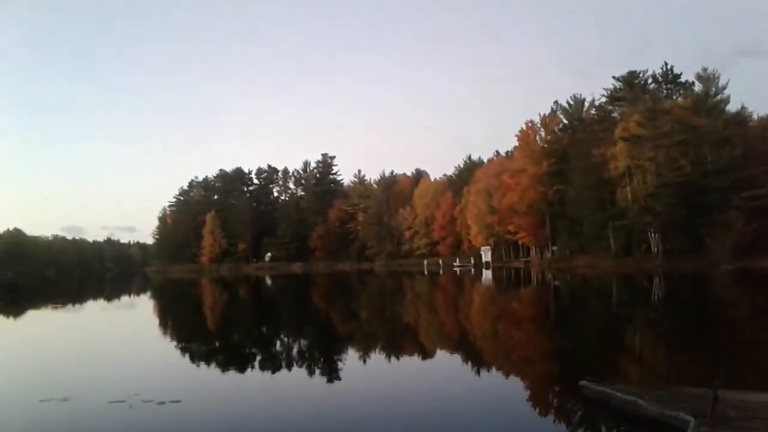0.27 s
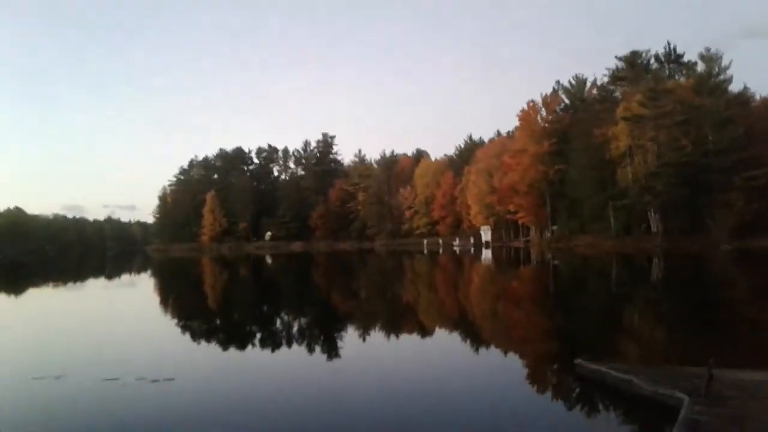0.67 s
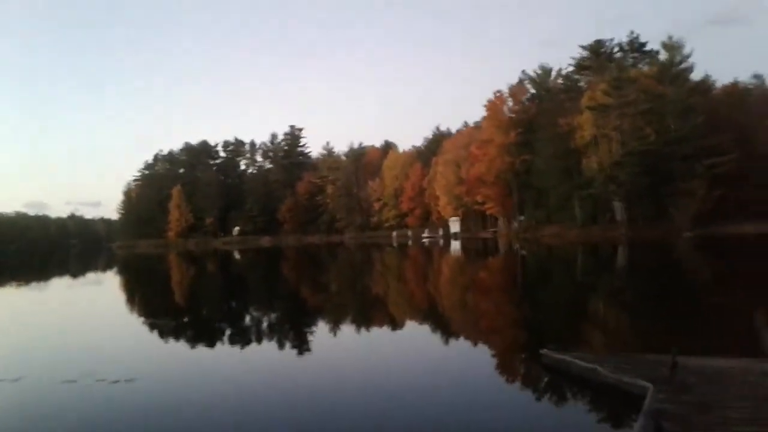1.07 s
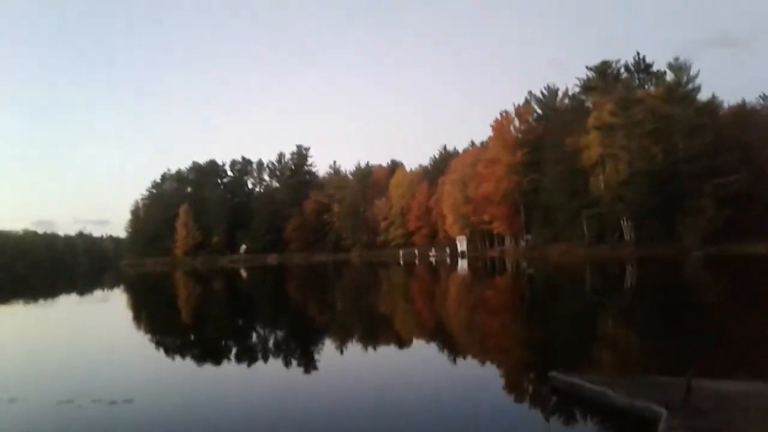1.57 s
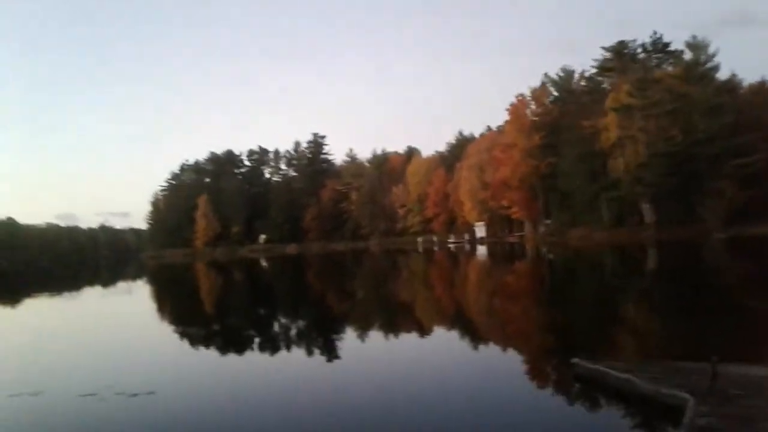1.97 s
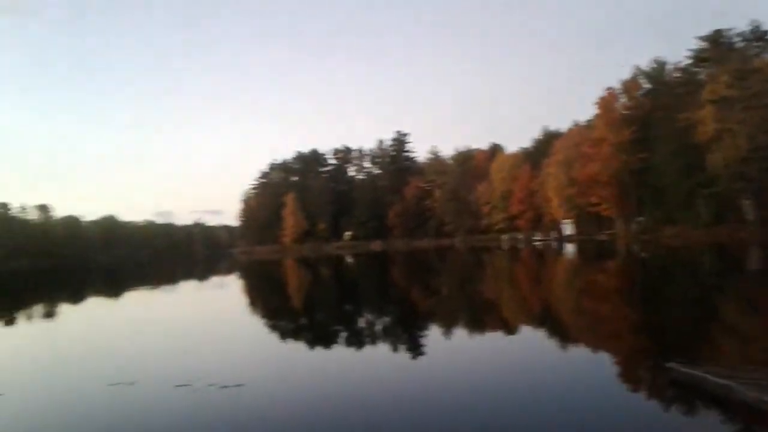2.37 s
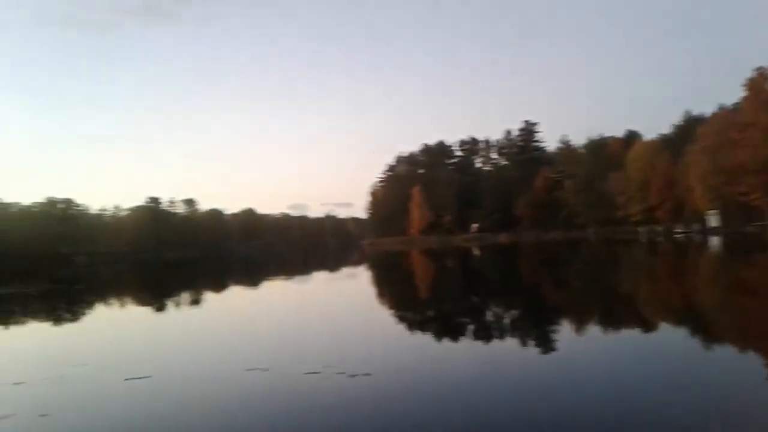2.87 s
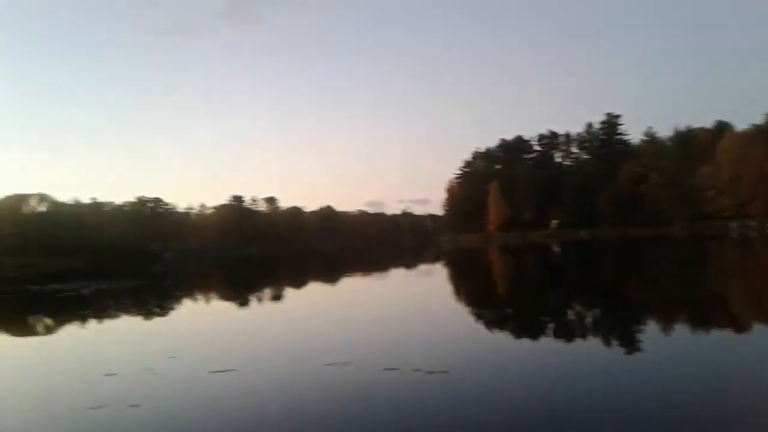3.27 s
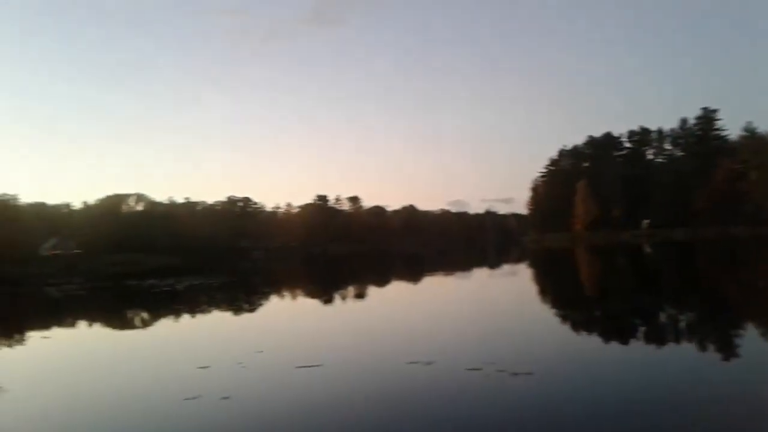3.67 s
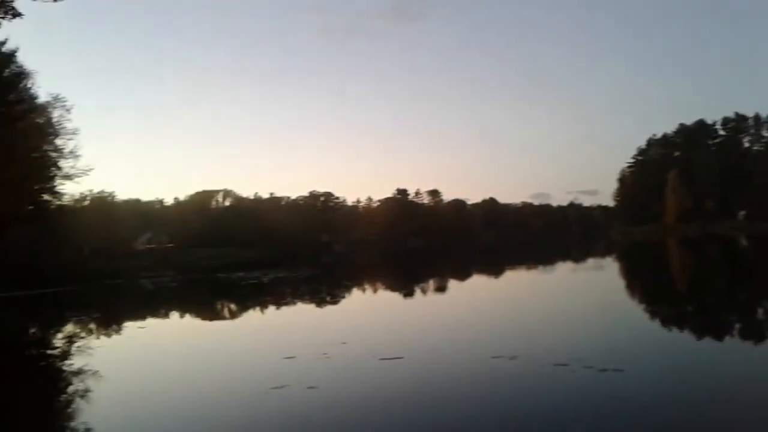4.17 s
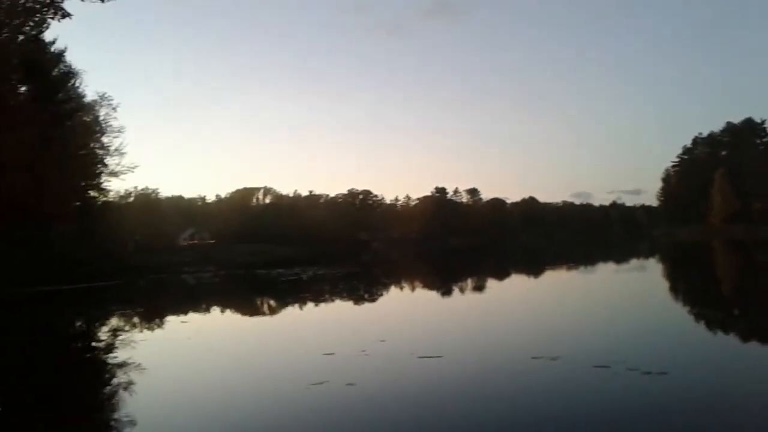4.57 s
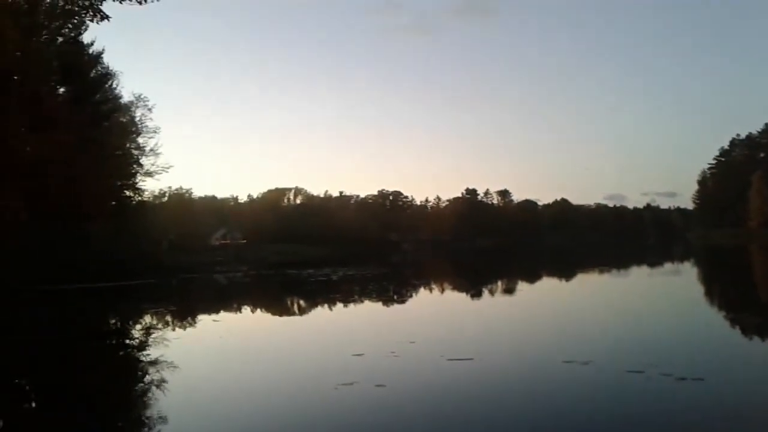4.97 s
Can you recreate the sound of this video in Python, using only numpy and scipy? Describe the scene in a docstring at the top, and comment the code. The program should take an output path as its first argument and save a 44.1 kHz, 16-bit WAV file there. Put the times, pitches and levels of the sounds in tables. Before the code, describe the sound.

Still outdoor air and faint hiss run throughout, heard through a small stereo camera by a wooded lake. At 0 s a dog's howl, off to the right, is already sounding with a rough rattle; by 0.2 s it clears to a mid-pitched hollow note and drops from about 0.5 s, leaving a dull echo from the trees. A very faint burry bird chip comes at 0.6 s. Tiny dry ticks occur at 0.1 s and in the pause, around 1.1, 1.5, 1.8 and 2 s. At 2.1 s a second howl scoops up with a bright, open yelp and holds steady. A chip sounds at 2.7 s. Around 3 s the voice cracks in quick breaks, then rattles loosely, slowing until 3.8 s, when it clears into a smooth, gradually softening note. Another chip at 4.2 s. The howl falls quickly just after 4.5 s, leaving fading echo and quiet air.

```python
"""A still lake: a dog's howl is already under way, rattling, then it clears and drops; a small bird chips.
A second howl scoops up, cracks into quick runs and a rattle, clears and drops, with two more chips.
The voice is harmonics whose pitch slips an octave, shaped by a throat; the wooded shore echoes as fading noise.
The chips are arched whistles. Faint ticks, short resonant noise bursts, come during the first howl and
between the howls. Soft air and hiss, both coloured noise, run throughout, heard through a small stereo camera."""
import sys
import numpy as np
from scipy import signal
from scipy.fft import rfft, irfft
from scipy.io import wavfile
from scipy.ndimage import uniform_filter1d, map_coordinates

SR = 44100
rng = np.random.default_rng(int(sys.argv[2]) if len(sys.argv) > 2 else 0)


def wav_record(signal):
    """Record a signal, one row per channel, as 16-bit PCM in the file named by sys.argv[1]."""
    frames = np.transpose(np.atleast_2d(signal))
    bounded = np.clip(frames, -1, 1)
    # unit amplitude maps onto the largest positive 16-bit level
    quanta = np.round(bounded * 32767).astype(np.int16)
    wavfile.write(sys.argv[1], SR, quanta)


N = 230062
T = np.arange(N) / SR  # time of each sample, s


def undb(db):
    """Turn decibels into gain."""
    return 10 ** (np.asarray(db) / 20)


def unit(x):
    """Scale to an rms of 1."""
    return x / np.sqrt(np.mean(x ** 2))


def curves(rows):
    """Join the points of a table by straight lines in time, one curve per column."""
    s, *columns = np.transpose(rows)
    return [np.interp(T, s, column) for column in columns]


def colour(x, points, share=1):
    """Filter by a spectrum of (f/Hz, level/dB) points, joined over log frequency."""
    size = 2 ** 18
    hz, db = np.transpose(points)
    f = np.maximum(np.fft.rfftfreq(size, 1 / SR), 1)
    gain = undb(share * np.interp(np.log(f), np.log(hz), db))
    return irfft(rfft(x, size) * gain)[..., :N]


def walk(rate):
    """Wander smoothly and at random, with rms 1, through `rate` random points per second."""
    knots = rng.standard_normal(4096)
    return unit(map_coordinates(knots, [T * rate], order=2, mode="wrap"))


def swell(s, rise_s, decay_s):
    """Rise smoothly to 1 at time s, then die away exponentially."""
    before, after = np.minimum(T - s, 0), np.maximum(T - s, 0)
    return np.exp(-(before / rise_s) ** 2 - after / decay_s)


# How throat and muzzle colour the voice: (f/Hz, level/dB)
THROAT = [(50, -37), (130, -3.5), (260, -14), (350, -4), (420, 1.5), (560, -3.5), (690, 1.5), (790, -2),
          (910, -1), (1050, -7.5), (1170, -5.5), (1320, -18), (1600, -27), (2100, -30.5), (2600, -48.5),
          (3650, -46), (4150, -44.5), (4600, -62), (5000, -53), (6000, -58)]
# Upper resonance of the mouth, which moves with the lips: (t/s, f/Hz, lift/dB)
FORMANT = [(.2, 2000, 2), (.45, 1800, -2), (2.16, 2210, 43), (2.22, 1940, -33), (2.45, 1950, -19),
           (3.0, 1960, 8), (3.65, 1920, 8), (4.0, 1770, 16), (4.5, 1816, 17.5)]
LOOSE_HZ = 172  # below this pitch the folds stop sounding


def dog(jitter=0.0061, crack_jitter=0.0317, shimmer_db=0.0, crack_db=1.0, snap_db=1.0,
        rasp_db=-43, shaky_rasp_db=12, voice_db=-1, formant_width_hz=130,
        ring_hz=682, ring_width_hz=45, ring_db=5, calm_ring_db=-6):
    """The vocal folds make harmonics, half lines when hoarse and a little rasp; the throat shapes them all."""
    times = slip_times()
    hz, db, mouth_db, edge_db, hoarse, shaky, runs_db = gesture(times)
    sounding = 1 / (1 + (LOOSE_HZ / hz) ** 6)
    firm = np.minimum(hz / 390, 1) ** 6.8  # loose folds at low pitch give almost a pure tone

    # pitch and strength are unsteady close to a slip, just after the yelp and in the drop
    midway = (times[1:] + times[:-1]) / 2
    nearest_slip = times[np.searchsorted(midway, T)]
    unsteady = np.maximum(np.exp(-((T - nearest_slip) / 0.014) ** 2), shaky)
    shaken_hz = hz * (1 + (jitter + crack_jitter * unsteady) * walk(200))
    hz, phase, strain, slack = slips(shaken_hz, times)

    half = hoarse * (1 - strain) * (1 - slack) * (1 + .5 * walk(45))
    odd = 1 - slack ** 2  # odd harmonics grow back after a slip
    formant_hz, lift_db = curves(FORMANT)
    lift = undb(lift_db)
    folds = 0
    for k in np.arange(1, 25) / 2:  # multiples of the pitch: 0.5, 1, 1.5 ... 12
        if k % 1:
            strength = half
        elif k % 2:
            strength = odd
        else:
            strength = 1
        resonance = 1 + lift / (1 + ((k * hz - formant_hz) / formant_width_hz) ** 2)
        folds = folds + np.sqrt(2) * firm ** abs(k - 1) * strength * resonance * np.cos(k * phase)

    # rasp is noise that pulses once per turn of the folds
    rasp_gain = undb(rasp_db + shaky_rasp_db * shaky) * firm * np.sqrt(SR / hz)
    rasp = rasp_gain * rng.standard_normal(N) * (1 + np.cos(phase))
    snap = slack ** 0.39  # each slip starts with a push that dies away
    tremble_db = crack_db * unsteady * walk(120) + snap_db * (2 * snap - 0.5) * unsteady
    voice = colour((folds + rasp) * undb(tremble_db), THROAT)

    # a narrow throat resonance rings more strongly wherever the voice is unsteady
    struck = voice * (undb(calm_ring_db) + unsteady * undb(ring_db + runs_db))
    b, a = signal.iirpeak(ring_hz, ring_hz / ring_width_hz, fs=SR)
    voice = voice + signal.lfilter(b, a, struck)

    # the open mouth lifts the middle band, effort lifts the top
    low = signal.sosfiltfilt(signal.butter(8, 780, fs=SR, output="sos"), voice)
    below_top = signal.sosfiltfilt(signal.butter(8, 1270, fs=SR, output="sos"), voice)
    voice = low + undb(mouth_db) * (below_top - low) + undb(edge_db) * (voice - below_top)
    return voice * undb(db + voice_db + shimmer_db * walk(24.55)) * sounding


# Base pitch of the held note, in three stretches where the voice is clear: (t/s, f/Hz)
NOTE = [
    [(0.245, 490), (0.291, 464), (0.373, 464.4), (0.387, 446.4), (0.46, 451.3)],
    [(2.24, 468.7), (2.458, 455.3), (2.566, 464.7), (2.578, 452.9), (2.88, 447.1)],
    [(3.83, 465), (3.898, 456.4), (4.272, 446.6), (4.398, 423.6), (4.51, 453.8)],
]
# a rattling voice is sharper, louder, slightly less open-mouthed, slightly edgier and hoarser
RATTLE_OCTAVES, RATTLE_DB, RATTLE_MOUTH_DB, RATTLE_EDGE_DB, RATTLE_HOARSE_DB = .08, 2.5, -1, 1, -18


def gesture(times, blend_s=.05, full_count=2):
    """Follow the howl with the greater pitch share, straining it in a rattle: pitch to extra ring in runs."""
    each = np.array([howl(*row) for row in HOWLS])
    strongest = each[:, 0].argmax(axis=0)
    share, db, mouth_db, edge_db, half, shaky = each[strongest, :, np.arange(N)].T
    recent_slips = np.searchsorted(times, T) - np.searchsorted(times, T - blend_s)
    rattle = uniform_filter1d(np.minimum(recent_slips / full_count, 1), int(blend_s * SR / 2))
    runs_db = sum(extra * np.exp(-(2 * (T - s) / length - 1) ** 4) for s, length, extra in RUNS)
    hz = curves(np.concatenate(NOTE))[0] * share * 2 ** (RATTLE_OCTAVES * rattle)
    return (hz,
            db + RATTLE_DB * rattle,
            mouth_db + RATTLE_MOUTH_DB * rattle,
            edge_db + RATTLE_EDGE_DB * rattle,
            half + undb(RATTLE_HOARSE_DB) * rattle,
            shaky,
            runs_db)


# The howls, the first already under way: (start t/s, release t/s, time to fall an octave/s,
# base level/dB, base lift of the band near 900 Hz/dB, base level of the hoarse half lines/dB)
HOWLS = [(-.6, .468, .078, -47, -0.5, -21), (2.118, 4.54, 0.0413, -47, 4, -30.5)]
SCOOP_S = 0.027  # a howl scoops up to its note
# it opens with a yelp: loud, wide-mouthed and bright, then briefly hoarse
YELP_AFTER_S, YELP_RISE_S, YELP_DECAY_S = 0.069, 0.011, 0.14
YELP_DB, YELP_EDGE_DB = 2, 10
GAPE_DB, GAPE_S = 15.5, 0.018
HOARSE_AFTER_S, HOARSE_RISE_S, HOARSE_DECAY_S, HOARSE_DB = .088, 0.0079, 0.037, -4
# on the held note: upper overtones are lifted; the voice tires slowly and dulls ever faster
EDGE_DB = 7
TIRE_DB_PER_S, DULL_DB_PER_S2 = 1.41, 2.5
# it ends with a last push; the mouth is more shut the further the pitch lies below the note
PUSH_DB, SHUT_DB_PER_OCTAVE = 5, 22.5


def howl(start, release, fall_s, db, mouth_db, hoarse_db, fall_curve=1.5):
    """Shape a scoop, yelp, held note and drop: share of pitch, level, mouth, edge, half lines, shakiness."""
    age = np.maximum(T - start, 0)
    scoop = (1 + np.tanh((T - start) / SCOOP_S / 2)) / 2
    fall = np.maximum(T - release, 0) / fall_s
    share = scoop / 2 ** np.minimum(fall ** fall_curve, 4)  # falls by four octaves at most
    octaves_below = -np.log2(np.maximum(share, 1 / 16))
    yelp = swell(start + YELP_AFTER_S, YELP_RISE_S, YELP_DECAY_S)
    gape = np.exp(-((age - YELP_AFTER_S) / GAPE_S) ** 2)
    croak = swell(start + HOARSE_AFTER_S, HOARSE_RISE_S, HOARSE_DECAY_S)
    push = np.sin(np.pi * np.minimum(fall, 1))
    return (share,
            db + YELP_DB * yelp + PUSH_DB * push - TIRE_DB_PER_S * age,
            mouth_db + GAPE_DB * gape - SHUT_DB_PER_OCTAVE * octaves_below,
            EDGE_DB + YELP_EDGE_DB * yelp - DULL_DB_PER_S2 * age ** 2,
            undb(hoarse_db) + undb(HOARSE_DB) * croak,
            np.maximum(croak, push))


# Rattles, where the folds slip at a loose beat:
# (start t/s, end t/s, gap between slips/s, last gap/s, time over which the gaps widen/s)
RATTLES = [(-.06, .199, .0238, .066, .02), (3.03, 3.806, .022, .045, .105)]
# Quick runs of slips, where the voice breaks hardest: (t/s, length/s, extra ring of the throat/dB)
RUNS = [(2.964, 0.022, 12.5), (3.057, .017, 12), (3.096, 0.047, 11.5), (3.168, .016, 4), (3.206, .033, 5)]
SLIP_HZ, SLIP_SCATTER_S = 115, .002  # rate of slips in a quick run; looseness of the rattle's beat


def slip_times():
    """Slips come at a loose beat that slows before the voice clears; in a quick run they crowd together."""
    times = []
    chances = rng.standard_normal((len(RATTLES), 80))
    for (start, end, gap, last_gap, widen_s), chance in zip(RATTLES, chances):
        s = end  # counted backwards from the end of the rattle
        for c in chance:
            in_run = any(-1 / SLIP_HZ < s - at < length for at, length, _ in RUNS)
            if s > start and not in_run:
                times.append(s + SLIP_SCATTER_S * c)
            s -= gap + (last_gap - gap) * np.exp((s - end) / widen_s)
    quick = [np.arange(at, at + length, 1 / SLIP_HZ) for at, length, _ in RUNS]
    return np.sort(np.concatenate([times] + quick))


def slips(hz, times, rise=.27, strain_s=.013, sag=.19, sag_s=.015, recover_s=.0017, uneven=.06):
    """The folds tighten, slip into the octave below, snap part of the way back and climb again."""
    edges = np.concatenate([[-1], times, [T[-1] + 1]])
    k = np.searchsorted(edges, T, side="right")
    since, until = T - edges[k - 1], edges[k] - T
    along = since / (since + until)  # 0 at the last slip, 1 at the next
    strain = np.sin(np.pi / 2 * along) * np.exp(-(until / strain_s) ** 2)
    droop = (1 - along) * np.exp(-(since / sag_s) ** 2)
    slack = (1 - along) * np.exp(-since / recover_s)
    octaves = rise + uneven * rng.standard_normal(len(edges))  # each slip comes at its own height
    sag = sag * (1 - np.exp(-((since + until) / sag_s) ** 2))  # in a quick run the folds stay tight
    bend = octaves[k] * strain - sag * droop - (1 - sag - octaves[k - 1]) * slack
    hz = hz * 2 ** bend
    turns, last = [], 0
    for part in np.split(hz / SR, np.flatnonzero(np.diff(k)) + 1):
        turns.append(last / 2 + np.cumsum(part))  # the old fundamental lives on as the second harmonic
        last = turns[-1][-1] % 1
    return hz, 2 * np.pi * np.concatenate(turns), strain, slack


def shore(x, t60=0.88, wet_db=-13.5, delay_s=0.025, apart=0.88):
    """Trunks and bank scatter the sound back, late and dull, a little differently to each port."""
    t = T[:int(1.5 * SR)]
    common, left, right = rng.standard_normal((3, len(t)))
    fade = np.exp(-np.log(1000) * t / t60) * (t > delay_s)
    tail = (common + apart * np.array([left, right])) * fade
    tail /= np.sqrt(np.sum(tail ** 2) / 2)
    echo = signal.fftconvolve(x[None], tail, axes=1)[:, :N]
    echo_colour = [(150, -14), (400, 14.5), (700, 3.5), (950, 5), (2000, 11.0), (4000, -12.0)]
    return undb(wet_db) * colour(echo, echo_colour)


# Chips of the bird: (t/s, length/s, top f/Hz before the flutter, level/dB)
CHIPS = [(0.604, 0.054, 3796, -69), (2.728, 0.076, 3820, -62.5), (4.183, .042, 3800, -60.5)]


def bird(arch=0.25, flutter=0.048):
    """Each chip is a burry whistle whose pitch arches up and down."""
    out, waver = 0, 1 + flutter * walk(600)
    for s, length, top_hz, db in CHIPS:
        u = np.clip(2 * (T - s) / length - 1, -1, 1)  # -1 at the start of the chip, 1 at its end
        hz = top_hz * (1 - arch * u ** 2) * waver
        out = out + undb(db) * (1 - u ** 2) * np.sin(2 * np.pi * np.cumsum(hz) / SR)
    return out


# Faint ticks: (t/s, peak level/dB, centre f/Hz, width of each filter pass/Hz, time for the burst to fall 60 dB/s)
TICKS = [(0.116, -53, 2380, 700, 0.014), (1.108, -60.5, 1900, 1600, .08), (1.483, -53.5, 2410, 1007, 0.011),
         (1.56, -52.5, 1400, 1600, 0.021), (1.763, -54.5, 3350, 2200, 0.02),
         (1.99, -55.5, 2200, 1002, 0.12)]


def ticks():
    """Each tick is a short, dying burst of noise, passed twice through one broad resonance."""
    out = np.zeros(N)
    for s, db, hz, width_hz, t60 in TICKS:
        fade = (T >= s) * undb(-60 * np.clip((T - s) / t60, 0, 3))
        burst = rng.standard_normal(N) * fade
        b, a = signal.iirpeak(hz, hz / width_hz, fs=SR)
        tick = signal.lfilter(b, a, signal.lfilter(b, a, burst))
        out += undb(db) * tick / np.abs(tick).max()
    return out


# Colour of the still air: (f/Hz, relative level/dB per Hz)
AIR = [(25, -26), (45, -6), (65, -0.5), (110, 3), (180, 2.5), (350, -1), (470, 0), (600, -4.5), (700, -5),
       (850, -7), (1500, -12.5), (2700, -18.5), (3600, -23.5), (5000, -35)]
# Colour of the hiss over it: (f/Hz, relative level/dB per Hz)
HISS_COLOUR = [(2500, 1), (4200, -8.5), (5000, -4), (5600, -6), (7200, -6), (7800, -3.5), (10500, -5.5),
               (13000, -4.5), (15500, -4.5)]
AIR_DB = -67  # level of the shared part of the air
# the hiss swells while the dog howls and settles after it
HISS_DB, HISS_SWELL_DB, HISS_SETTLE_S = -70.5, 3.5, 0.063


def air(apart=0.84):
    """Soft outdoor air and hiss are coloured noises, each partly shared by the ports and partly opposite."""
    mid, side, hiss, own = rng.standard_normal((4, N))
    sides = np.array([[1], [-1]])
    hush = unit(colour(mid, AIR)) + apart * unit(colour(side, AIR)) * sides
    own_hiss = colour(own, [(2500, -0.5), (4500, -7.0), (7000, -4), (9000, -72)])
    hiss = colour(hiss, HISS_COLOUR) + sides * own_hiss

    def settled(s):
        """Approach 1 gradually after time s."""
        return 1 - np.exp(-np.maximum(T - s, 0) / HISS_SETTLE_S)

    howling = sum(settled(start) - settled(release + fall_s) for start, release, fall_s, *_ in HOWLS)
    return hush * undb(AIR_DB), unit(hiss) * undb(HISS_DB + HISS_SWELL_DB * howling)


# Lag of the voice and echo at the left port, changing as the camera turns: (t/s, lag/ms)
LAG = [(0, .27), (2.2, 0.21), (2.8, 0.34), (4.5, 0.39)]


def scene(bird_echo_db=19):
    """The dog is off to the right, so its voice reaches the left port later; the bird is straight ahead."""
    howls, chips = dog(), bird()
    left, right = howls + shore(howls + undb(bird_echo_db) * chips)
    lag_samples = curves(LAG)[0] * SR / 1000
    left = map_coordinates(left, [np.arange(N) - lag_samples], order=3)
    hush, hiss = air()
    outdoors = colour(np.array([left, right]) + hush, [(12, 5), (30, -1.0)])  # the lowest rumble is lifted
    return outdoors + chips + hiss + ticks()


# Colour difference of the two ports: (f/Hz, left minus right level/dB)
PORTS = [(100, -2), (450, -2.5), (680, -5.5), (800, -1), (950, 2.5), (1200, 0), (1400, -1.5), (1750, 1),
         (2300, -2.5), (3700, -.5), (5000, -4.5), (7000, -1.5), (11000, -.4)]
TOP_HZ = 15700  # the treble is cut above this


def record(dry):
    """Each port takes half the colour difference, in opposite directions; a steep filter cuts the top."""
    ports = np.array([colour(dry[0], PORTS, .5), colour(dry[1], PORTS, -.5)])
    return signal.sosfilt(signal.ellip(10, .2, 70, TOP_HZ, fs=SR, output="sos"), ports)


dry = scene()
out = record(dry)
wav_record(out)
```